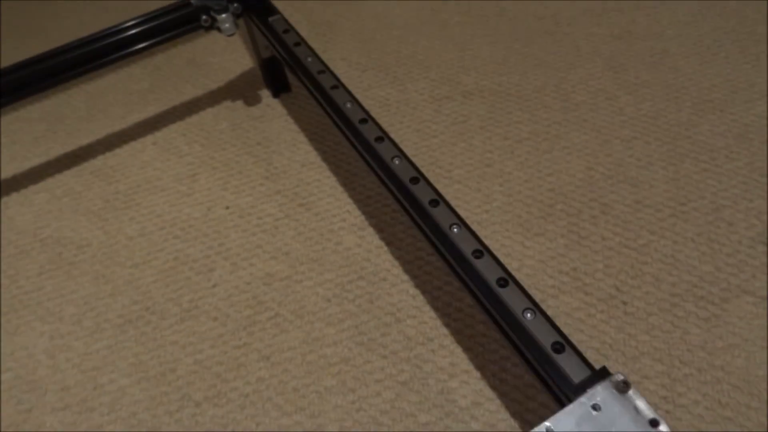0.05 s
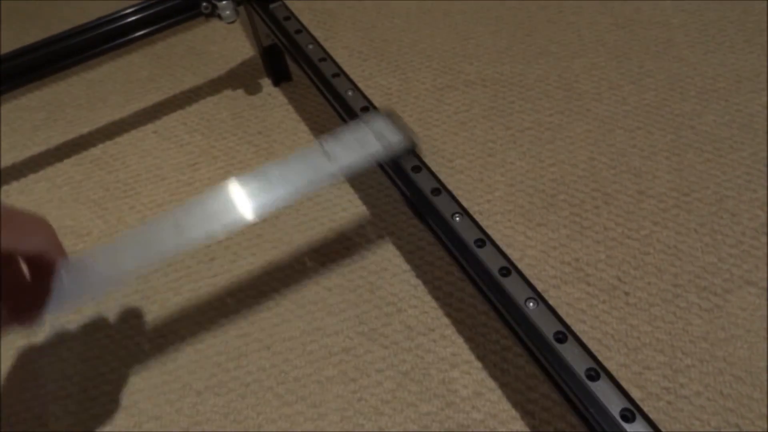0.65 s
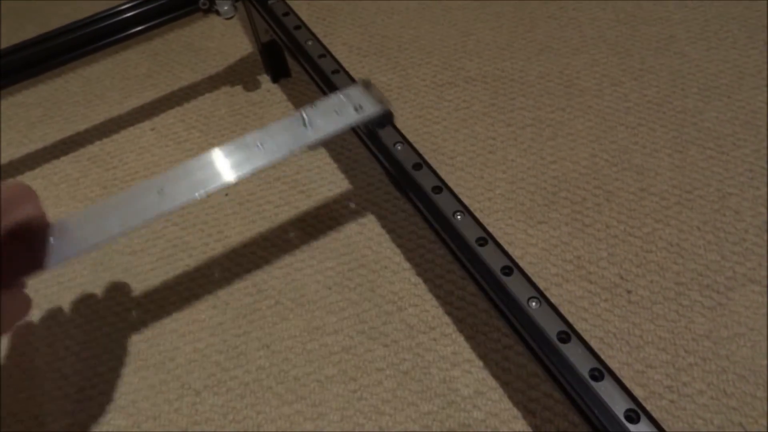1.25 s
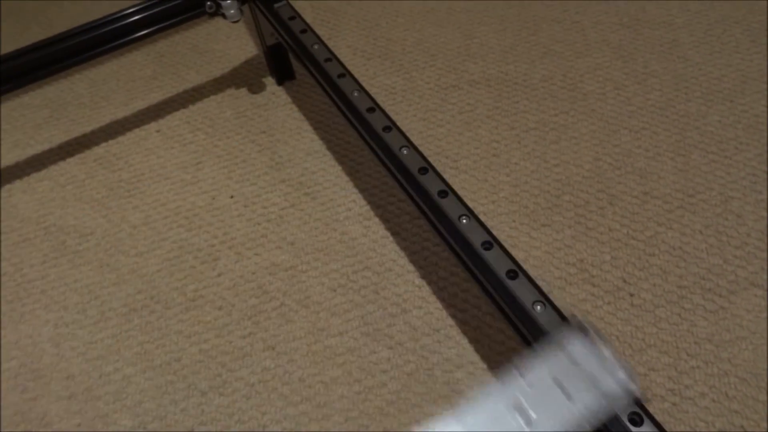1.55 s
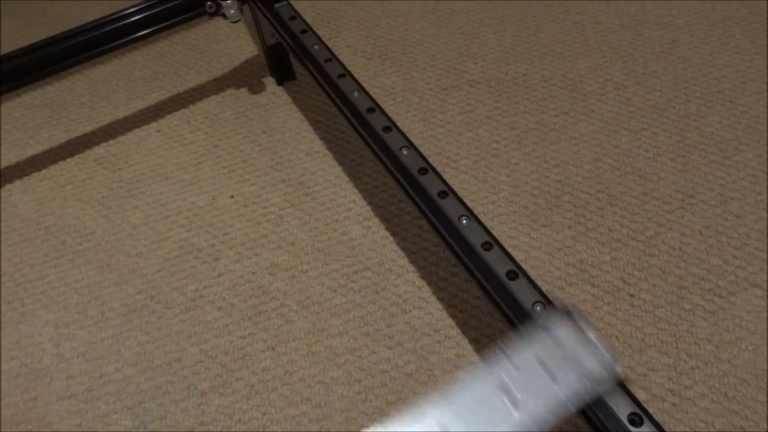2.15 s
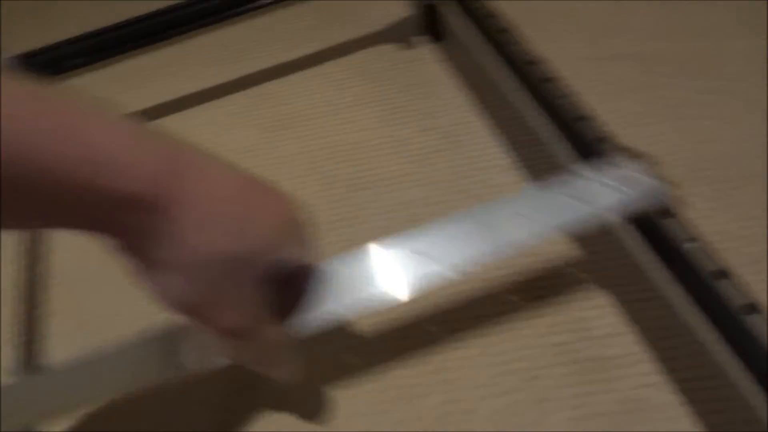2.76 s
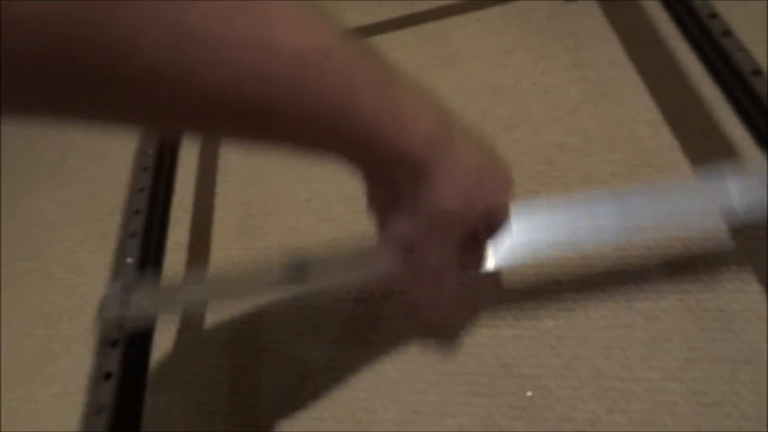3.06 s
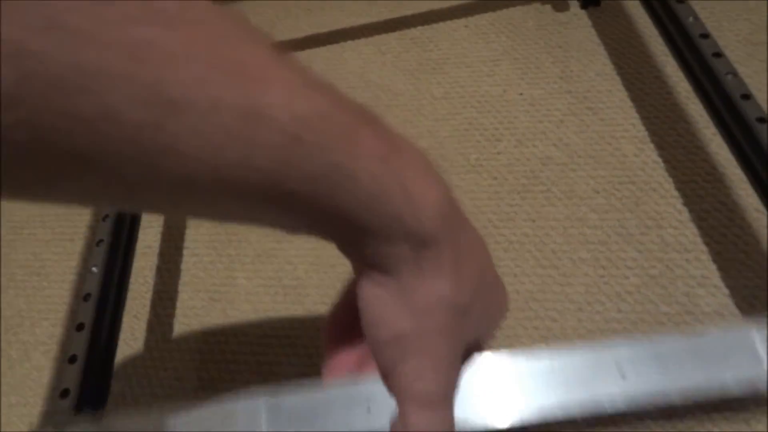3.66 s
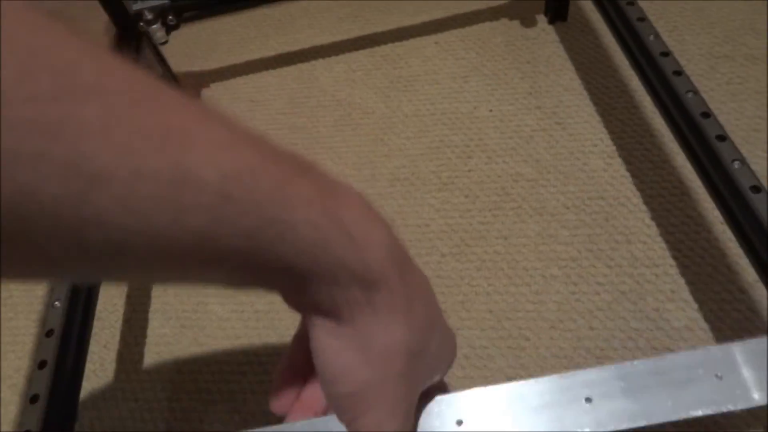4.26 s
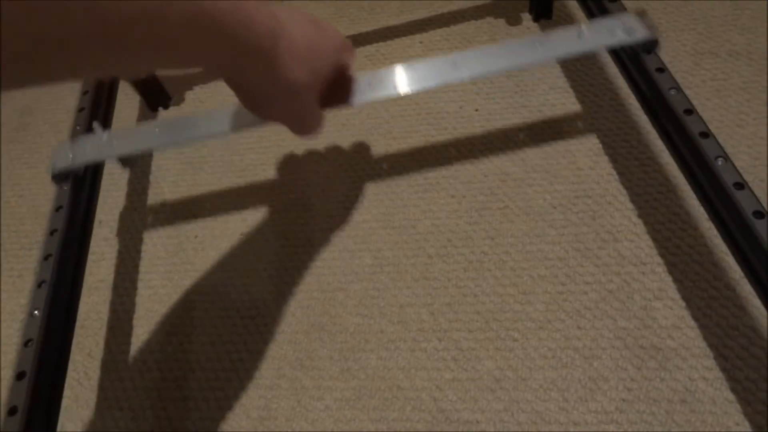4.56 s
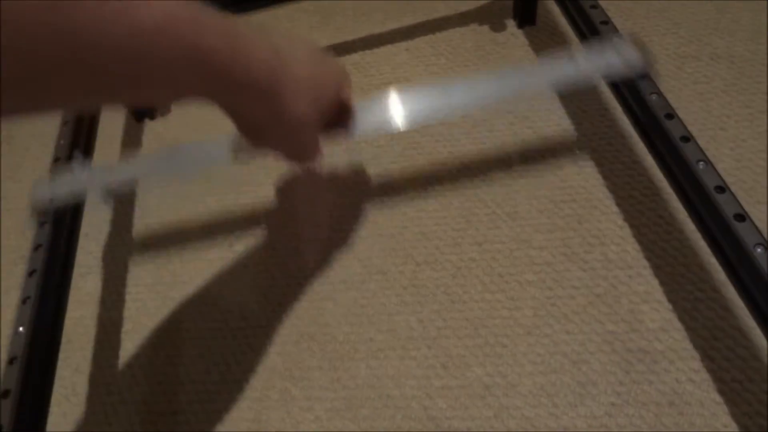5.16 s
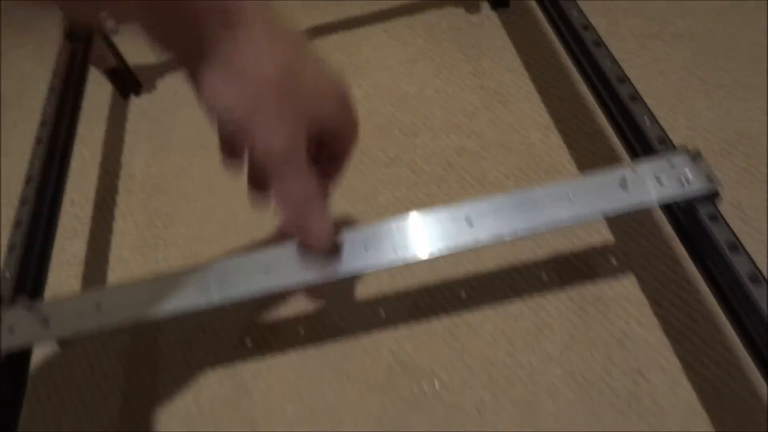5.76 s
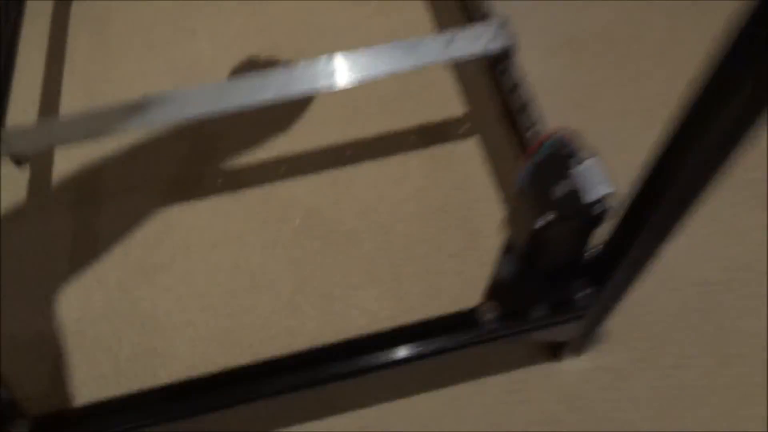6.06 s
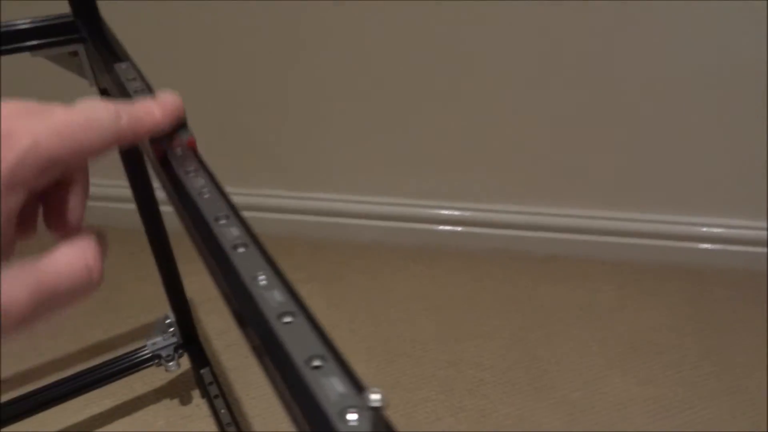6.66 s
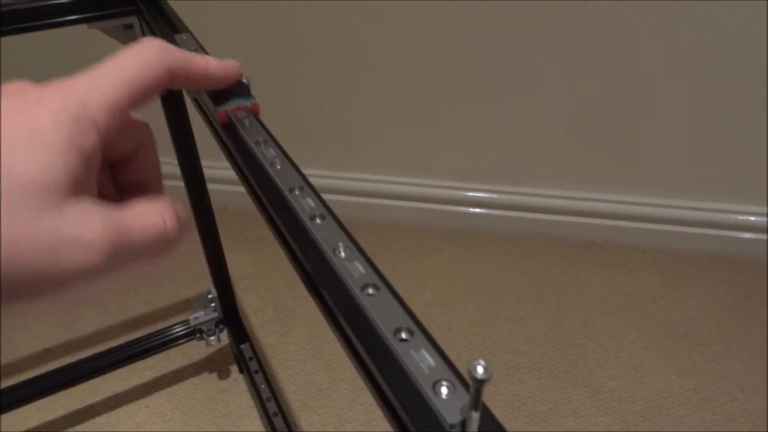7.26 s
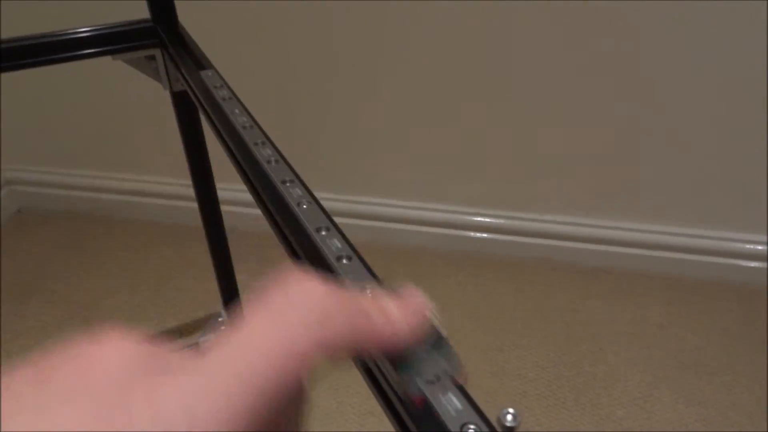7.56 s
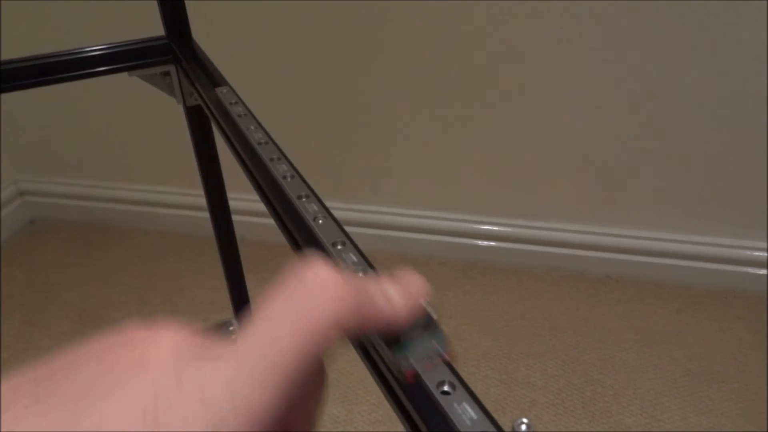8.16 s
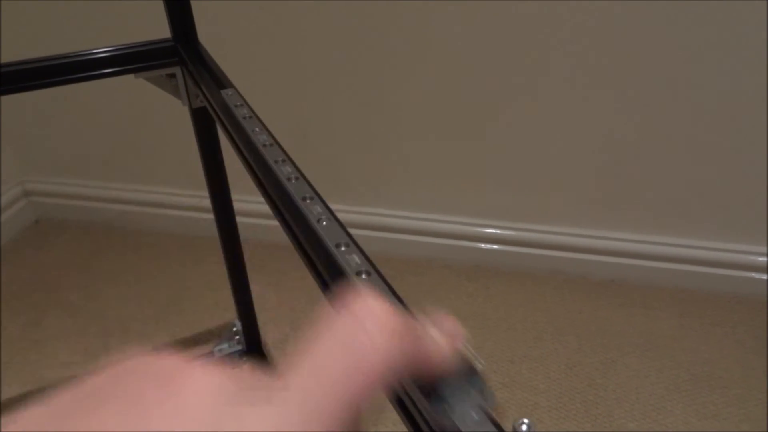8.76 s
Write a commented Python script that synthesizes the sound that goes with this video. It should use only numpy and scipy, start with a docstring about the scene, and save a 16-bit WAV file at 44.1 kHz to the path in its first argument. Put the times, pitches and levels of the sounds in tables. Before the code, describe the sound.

Close up in a small, dry room, bearing carriages carrying a metal bar roll rapidly to and fro on steel rails, making a rhythmic rasp with a gliding whistle, brief chatter and a faint ring from the frame. After about six seconds they stop, leaving a soft finger scuff and light handling ticks. One loose carriage then runs back and forth in bright, grainy hissing strokes that start softly and grow louder.

```python
"""A hand shoves a metal bar on ball-bearing carriages to and fro along two rails in a small carpeted room.
The balls read the roughness of the steel: the rasp brightens with speed, a fuzzy whistle rises and falls
with each stroke, rails and frame ring. At 5.8 s a finger brushes off the bar; handling ticks follow.
From 6.6 s one bare carriage is flicked back and forth. The microphone is close, its peaks limited."""
import sys
import numpy as np
from scipy import signal
from scipy.fft import rfft, irfft, next_fast_len
from scipy.io import wavfile
from scipy.ndimage import uniform_filter1d, minimum_filter1d

SR = 44100
rng = np.random.default_rng(int(sys.argv[2]) if len(sys.argv) > 2 else 0)


def put_to_file(sound):
    """Save the sound as 16-bit audio at rate SR, in the file named by the first command-line argument."""
    columns = np.atleast_2d(sound).T  # one column per channel
    safe = np.clip(columns, -1, 1)
    whole_steps = np.round(safe * 32767)
    wavfile.write(sys.argv[1], SR, whole_steps.astype(np.int16))


N = 398093
HOP = 64
TIME_S = np.arange(N) / SR
HOP_S = np.arange(N // HOP + 3)[:, None] * HOP / SR
BIN_HZ = np.fft.rfftfreq(4 * HOP, 1 / SR)

# pushes on the bar: start_s, fastest_s, stop_s, top_m_per_s, level_db
BAR_STROKES = [(-0.2, -0.016, 0.2, 2.1, -10.5), (0.519, 0.762, 0.88, 2.01, -11),
               (0.859, 1.034, 1.197, 2, -10.5), (1.153, 1.293, 1.458, 2.36, -9.3),
               (1.44, 1.565, 1.843, 2.07, -10.6), (1.756, 1.923, 2.103, 2.54, -9.8),
               (2.044, 2.209, 2.394, 2.34, -10.6), (2.354, 2.516, 2.665, 2.1, -10.5),
               (2.629, 2.93, 3.17, 1.23, -15), (3.072, 3.232, 3.476, 2.03, -9.6),
               (3.407, 3.574, 3.8, 2.25, -9.5), (3.735, 3.933, 4.114, 2.46, -9.5),
               (4.063, 4.224, 4.463, 2.25, -10.5), (4.406, 4.584, 4.767, 2.6, -9),
               (4.737, 4.908, 5.132, 2.2, -10.5), (5.076, 5.238, 5.424, 2.9, -8.5),
               (5.375, 5.562, 5.709, 2.16, -11.1)]
# aluminium frame resonances: pitch_hz, half_width_hz, relative_db
FRAME_MODES = [(335, 16, -14), (519, 20, -7.5), (562, 24, -5.5), (667.4, 7.1, 5), (699, 51, -2)]
# balls catching as they speed up or brake: start_s, pitch_hz, lift_db
CHATTER = [(.655, 4560, 7), (.755, 5760, 10), (.928, 3620, 10), (1.478, 3220, 10), (2.107, 3430, 9),
           (2.44, 5240, 8), (2.585, 3600, 11), (2.725, 2080, 4), (2.855, 4500, 9), (3.325, 5594, 11),
           (3.49, 4750, 9), (4.128, 4360, 8), (4.345, 3970, 9), (4.461, 2600, 10), (4.645, 5500, 7.5),
           (4.812, 4080, 10), (5.455, 3730, 6), (5.485, 5700, 9)]


def amp(db):
    return 10 ** (np.asarray(db) / 20)


def unit_rms(x):
    return x / np.sqrt(np.mean(x ** 2) + 1e-20)


def wander(shape, span):
    """Unit-rms noise, smoothed over span steps of the first axis."""
    return unit_rms(uniform_filter1d(rng.standard_normal(shape), size=span, axis=0))


def curve_at(points, hz):
    """Interpolate on a log-frequency axis."""
    point_hz, value = np.transpose(points)
    return np.interp(np.log(hz + 1), np.log(point_hz + 1), value)


def bell(hz, centre_hz, octaves):
    return np.exp(-.5 * (np.log2((hz + 1) / centre_hz) / octaves) ** 2)


def coloured(x, db_at):
    """Causal filter of gain db_at(hz): its peaks ring after the sound."""
    log_gain = np.log(amp(db_at(abs(np.fft.fftfreq(16384, 1 / SR)))))
    taps = np.fft.ifft(np.exp(np.conj(signal.hilbert(log_gain)))).real[:8192]
    return signal.oaconvolve(x, taps)[:N]


def swell(t, rise_s, decay_s, hold_s=0):
    """Linear rise, hold, exponential decay."""
    return np.clip(t / rise_s, 0, 1) * np.exp(-np.maximum(t - rise_s - hold_s, 0) / decay_s)


def room_noise(level_db=-46):
    """Steady room noise and microphone hiss."""
    # noise spectrum: freq_hz, density_db
    spectrum = [(25, -25), (70, -21), (120, -15), (230, -6.5), (330, -2), (500, 0), (1100, 0), (1600, -3),
                (4000, -7), (11700, -11.5), (15800, -15), (17500, -40)]
    # left-right likeness: freq_hz, correlation
    likeness = [(60, 0.92), (300, 0.17), (1000, 0.071), (4000, 0.14), (15000, 1)]
    size = next_fast_len(N, True)
    hz = np.fft.rfftfreq(size, 1 / SR)
    left, other = rfft(rng.standard_normal((2, size)))
    same = np.clip(curve_at(likeness, hz), -1, 1)
    pair = np.array([left, same * left + np.sqrt(1 - same ** 2) * other])
    return amp(level_db) * unit_rms(irfft(pair * amp(curve_at(spectrum, hz)), size)[:, :N])


def side_echoes(x, t60_s=.11, delay_s=.002):
    """Short echoes from the sides make left and right differ."""
    # echo against direct sound: freq_hz, gain_db
    echo = [(200, -0.5), (600, -3.5), (1200, -5.5), (2200, -10), (4000, -11), (8000, -12.5), (13000, -29.5)]
    t = np.arange(SR // 4) / SR
    tail = rng.standard_normal(len(t)) * np.exp(-np.log(1000) * t / t60_s) * (t > delay_s)
    reflected = signal.oaconvolve(x, tail / np.linalg.norm(tail))[:N]
    side = coloured(reflected, lambda hz: curve_at(echo, hz))
    return np.array([x + side, x - side])


def touches():
    """Fingers and loose parts give short puffs of noise."""
    # handling ticks, one finger scuff: start_s, level_db, centre_hz, width_octaves, rise_s, decay_s
    puffs = [(0.27, -45, 8340, .7, 0.00088, 0.0049), (.423, -37, 6500, 0.97, .001, .006),
             (.562, -37, 8500, .6, .001, .008), (6.07, -35.5, 2800, 0.88, .001, 0.0027),
             (6.245, -46, 1197, .8, .002, .007), (6.408, -40.5, 1000, 0.83, .002, .007),
             (5.79, -38, 6800, 0.7, 0.044, 0.03)]
    out, t = np.zeros(N), np.arange(SR // 4) / SR
    hz = np.fft.rfftfreq(len(t), 1 / SR)
    for start_s, db, centre_hz, octaves, rise_s, decay_s in puffs:
        noise = irfft(rfft(rng.standard_normal(len(t))) * bell(hz, centre_hz, octaves), len(t))
        out[round(start_s * SR):][:len(t)] += amp(db) * swell(t, rise_s, decay_s) * unit_rms(noise)
    return out


def finger_brush(start_s=5.795, level_db=-43, t60_s=.27):
    """A finger brushes off the bar and leaves it ringing."""
    # bar resonances: pitch_hz, relative_db
    modes = [(5400, -2), (7350, -4), (7800, -7), (9450, -5), (11050, -8)]
    out, t = np.zeros(N), np.arange(SR // 2) / SR
    ring = unit_rms(sum(amp(db) * np.sin(2 * np.pi * (hz * t + rng.random())) for hz, db in modes))
    envelope = swell(t, rise_s=.04, hold_s=.03, decay_s=t60_s / np.log(1000))
    out[round(start_s * SR):][:len(t)] = amp(level_db) * envelope * ring
    return out


def frame_jolts(waver_hz=4.3, t60_s=.5):
    """The bar jolts the frame; its strongest mode rings out."""
    # jolts: start_s, level_db, hold_s
    jolts = [(1.31, -35.5, .02), (1.53, -42, 0.074), (2.19, -38.5, .03), (3.335, -33, 0.034),
             (3.54, -36, 0.15), (4.21, -37, 0.11), (4.645, -33.5, .02), (5.31, -38, .02), (5.51, -37, .05)]
    out, t = np.zeros(N), np.arange(SR // 2) / SR
    mode_hz = max(FRAME_MODES, key=lambda mode: mode[2])[0]
    for start_s, db, hold_s in jolts:
        envelope = swell(t, rise_s=.027, hold_s=hold_s, decay_s=t60_s / np.log(1000))
        phase = 2 * np.pi * np.cumsum(mode_hz + waver_hz * wander(len(t), 900)) / SR
        out[round(start_s * SR):][:len(t)] += amp(db) * envelope * np.sin(phase)
    return out


def push(start_s, fastest_s, stop_s, t):
    """One hand stroke, 0-1: a quarter sine up, a quarter sine down."""
    return np.abs(np.sin(np.pi * np.interp(t, [start_s, fastest_s, stop_s], [0, .5, 1])))


def stroke_gain(strokes, t, steepness, knee, rest_db, uneven_db):
    """Loudness grows as a power of speed and levels off above the knee; a resting hand still stirs it."""
    power = amp(rest_db) ** 2 * ((t > strokes[0][0]) & (t < strokes[-1][2]))
    for start_s, fastest_s, stop_s, _, db in strokes:
        drive = push(start_s, fastest_s, stop_s, t) ** (2 * steepness)
        power = power + amp(db) ** 2 * drive * (1 + knee ** 2) / (drive + knee ** 2)
    grip = np.interp(t, HOP_S[:, 0], wander(len(HOP_S), 17))
    return np.sqrt(power) * amp(uneven_db * grip)


def frame_hum(gain_db=-36.5):
    """The rolling bar shakes the frame's low modes, even at low speed."""
    def modes_db(f):
        power = sum(amp(db) ** 2 / (1 + ((f - hz) / width) ** 2) ** 2 for hz, width, db in FRAME_MODES)
        return 10 * np.log10(power + 1e-9)
    gain = amp(gain_db) * stroke_gain(BAR_STROKES, TIME_S, steepness=1.22, knee=.35,
                                  rest_db=-19.5, uneven_db=2.5)
    drive = gain * rng.standard_normal(N)
    return np.sqrt(np.mean(gain ** 2)) * unit_rms(coloured(drive, modes_db))


def rail_modes_db(f, modes, ripple_db=1.98, contrast=1.223):
    """A rail's strong modes stand among countless weak ones."""
    grid_hz = np.arange(0, SR / 2, 20)
    weak = np.interp(f, grid_hz, wander(len(grid_hz), 2))
    strong = sum(db / (1 + (2 * (f - hz) / width) ** 2) for hz, width, db in modes)
    return ripple_db * weak + contrast * strong


def rail_ring(power, ring_db):
    """The steel stores power in each band and sounds on through the turn of a stroke."""
    # rail decay: freq_hz, t60_s
    decay = [(600, .6), (2000, .5), (5000, .45), (9000, .26), (15000, .14)]
    kept = np.exp(-2 * np.log(1000) * HOP / SR / curve_at(decay, BIN_HZ))
    stored = np.transpose([signal.lfilter([1 - k], [1, -k], band) for k, band in zip(kept, power.T)])
    return (power + amp(ring_db) ** 2 * stored) / (1 + amp(ring_db) ** 2)


def speed_m_per_s(strokes, creep_m_per_s, ease, tremor):
    """Each stroke speeds up and brakes, a little jerkily; the balls never quite rest."""
    speed = sum(top * push(*times_s, HOP_S) ** ease for *times_s, top, _ in strokes)
    return np.hypot(speed * (1 + tremor * wander(HOP_S.shape, 11)), creep_m_per_s)


def roughness_db(speed, grain_m, slope_db, full_m_per_s=2):
    """The contact patch smooths away shorter bumps: the corner frequency is speed over length."""
    def rolloff_db(m_per_s):
        return -slope_db * np.log10(1 + (BIN_HZ * grain_m / m_per_s) ** 2)
    return rolloff_db(speed) - rolloff_db(full_m_per_s)


def whistle_db(speed):
    """Two ripples in the raceway, uneven along the rail, sing at speed over wavelength."""
    db = 0
    for wavelength_m, lift_db in [(.000347, 6.5), (.000262, 5.5)]:
        depth = 1 + .43 * wander(speed.shape, 25)
        db = db + lift_db * depth * bell(BIN_HZ, speed / wavelength_m, octaves=.07)
    return db


def catching(start_s):
    """The balls catch at once; their chatter dies away."""
    return swell(HOP_S - start_s, rise_s=.0037, decay_s=.023)


def chatter_db():
    """Each burst of chatter lifts a narrow band."""
    return sum(db * catching(start_s) * bell(BIN_HZ, hz, octaves=.14) for start_s, hz, db in CHATTER)


def microphone_turn_db(start_s=2.6, length_s=.4, lift_db=2, centre_hz=13100):
    """The microphone swings to face the bar and catches more treble from then on."""
    return lift_db * np.clip((HOP_S - start_s) / length_s, 0, 1) * bell(BIN_HZ, centre_hz, octaves=.45)


def rolling(speed, gain, shape_db, colour, modes, knocks_per_m, knock_gain, ring_db, patchy_db=1.5):
    """Rolling noise and ball-to-ball knocks pass the rail modes; shape_db tilts, gain sets the power."""
    knock_chance = knocks_per_m * np.interp(TIME_S, HOP_S[:, 0], speed[:, 0]) / SR
    knocks = (rng.random(N) < knock_chance) * rng.standard_normal(N) / np.sqrt(knock_chance)
    drive = rng.standard_normal(N) + knock_gain * knocks
    rasp = unit_rms(coloured(drive, lambda hz: curve_at(colour, hz) + rail_modes_db(hz, modes)))
    patches = unit_rms(uniform_filter1d(wander(shape_db.shape, 13), size=4, axis=1))
    power = amp(shape_db + patchy_db * patches) ** 2
    colour_power = amp(curve_at(colour, BIN_HZ)) ** 2
    mean_power = power @ colour_power / colour_power.sum()
    power *= (gain ** 2 / mean_power)[:, None]
    bands = signal.stft(rasp, nperseg=4 * HOP, noverlap=3 * HOP)[2]
    bands *= np.sqrt(rail_ring(power, ring_db)).T[:, :bands.shape[1]]
    return signal.istft(bands, nperseg=4 * HOP, noverlap=3 * HOP)[1][:N]


def bare_carriage(gain_db=-.07):
    """Loose, unloaded balls give a brighter, grainier hiss."""
    # flicks: start_s, fastest_s, stop_s, top_m_per_s, level_db
    strokes = [(6.645, 6.789, 6.99, 0.63, -22.5), (6.912, 7.027, 7.286, 1.2, -17.5),
               (7.226, 7.342, 7.494, 1.86, -13), (7.457, 7.637, 7.84, 1.3, -15.5),
               (7.788, 7.897, 8.141, 2.3, -11.5), (8.074, 8.236, 8.422, 2.2, -13.3),
               (8.375, 8.526, 8.71, 1.8, -12.5), (8.674, 8.847, 9.03, 2.03, -12),
               (8.959, 9.152, 9.6, 2.3, -9)]
    # hiss spectrum at full speed: freq_hz, density_db
    colour = [(150, -40.5), (260, -28), (390, -29.5), (520, -21.5), (700, -25.5), (950, -20), (1400, -12),
              (1900, -9.3), (2300, -3.5), (3400, -1), (5000, -4), (7200, 0), (9200, -1.5), (12000, 1.5),
              (15800, -1), (17500, -42)]
    # rail bending modes: pitch_hz, width_hz, lift_db (before contrast)
    modes = [(760, 45, 8.6), (1163, 21, 5.4), (1276, 33, 8.8), (1492, 120, 6.8), (1656, 53, 8.3),
             (2213, 95, 3.5), (2357, 24, 6.1), (2780, 110, 3.7), (2960, 37, 6.4), (3293, 61, 6.5),
             (3660, 160, 4.4), (3910, 61, 4.5), (4150, 34, 5), (4257, 95, 3.7), (4470, 53, 7.7),
             (4780, 170, 4.2), (5040, 92, 4.7), (5360, 160, 4.3), (5680, 130, 4.3), (6540, 60, 4.4),
             (6816, 43, 2.7), (7880, 200, 3.1), (7940, 95, 5.3), (8250, 101, 2.5), (9399, 105, 2.9),
             (10040, 60, 4.2)]
    speed = speed_m_per_s(strokes, creep_m_per_s=.32, ease=1.6, tremor=.047)
    shape_db = roughness_db(speed, grain_m=.00024, slope_db=10)
    shake = stroke_gain(strokes, HOP_S[:, 0], steepness=2.74, knee=2.1, rest_db=-62, uneven_db=.86)
    return rolling(speed, amp(gain_db) * shake, shape_db, colour, modes,
                   knocks_per_m=1100, knock_gain=.59, ring_db=-8)


def sliding_bar(gain_db=.27):
    """Loaded carriages under the bar: a rasp with a gliding whistle, louder when the balls chatter."""
    # rasp spectrum at full speed: freq_hz, density_db
    colour = [(120, -48), (330, -41), (520, -20.5), (850, -22), (1050, -17.5), (1300, -23), (1900, -12.5),
              (3000, -1), (4500, -2.5), (5700, 1), (7800, -5.5), (11000, -6.5), (15800, -10.5),
              (17500, -34)]
    # loaded rail bending modes: pitch_hz, width_hz, lift_db (before contrast)
    modes = [(1260, 215, 7), (1473, 116, 8.5), (1650, 57, 4), (1750, 54, 7), (1897, 183, 9),
             (2047, 45, 5.5), (2216, 91, 5.5), (2480, 127, 1.5), (2720, 46, 5), (3285, 38, 6.5),
             (3700, 230, 2.5), (4065, 180, 4.5), (4340, 130, 4), (4685, 220, 4.5), (5170, 100, 3.5),
             (5460, 180, 1.5), (5650, 150, 4.3), (6270, 140, 3.5), (6600, 150, 3), (6920, 120, 4),
             (7290, 100, 6.5), (7400, 34, 2), (7785, 184, 8), (8050, 115, 4), (8310, 86, 5.5),
             (8470, 59, 1.5), (8680, 190, 2), (9100, 53, 4), (9620, 219, 3), (10050, 230, 0.5)]
    speed = speed_m_per_s(BAR_STROKES, creep_m_per_s=.44, ease=1.55, tremor=.03)
    shape_db = roughness_db(speed, grain_m=.00037, slope_db=17)
    shape_db += whistle_db(speed) + chatter_db() + microphone_turn_db()
    flare_db = .37 * sum(db * catching(start_s)[:, 0] for start_s, _, db in CHATTER)
    shake = stroke_gain(BAR_STROKES, HOP_S[:, 0], steepness=3.164, knee=.58, rest_db=-48.5, uneven_db=.41)
    return rolling(speed, amp(gain_db + flare_db) * shake, shape_db, colour, modes,
                   knocks_per_m=800, knock_gain=.34, ring_db=-10)


def scene():
    """All sources in the room, in stereo."""
    direct = sliding_bar() + bare_carriage() + frame_hum() + frame_jolts() + touches() + finger_brush()
    return side_echoes(direct) + room_noise()


def record(dry, ceiling=.95, cutoff_hz=15850):
    """Fast peak limiter, then a steep low-pass."""
    allowed = np.minimum(1, ceiling / (abs(dry).max(0) + 1e-9))
    gain = uniform_filter1d(minimum_filter1d(allowed, size=48), size=48)
    lowpass = signal.firwin(1023, cutoff_hz, window=("kaiser", 9), fs=SR)
    return signal.oaconvolve(dry * gain, lowpass[None], "same")


dry = scene()
out = record(dry)
put_to_file(out)
```